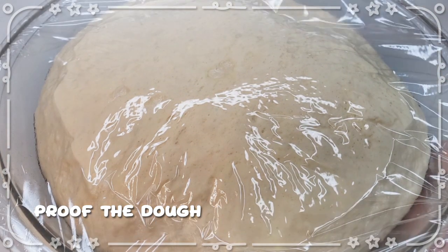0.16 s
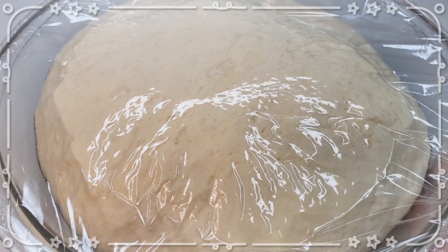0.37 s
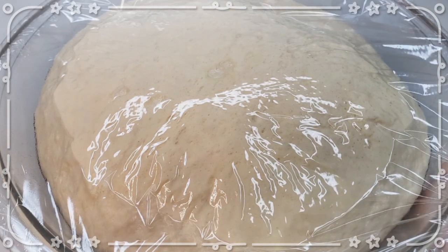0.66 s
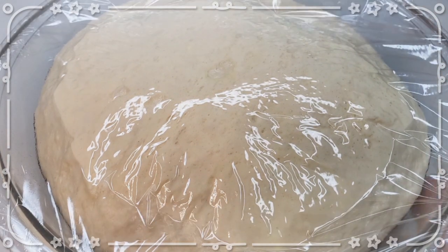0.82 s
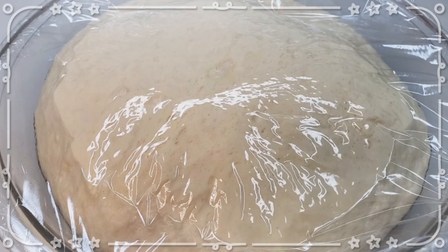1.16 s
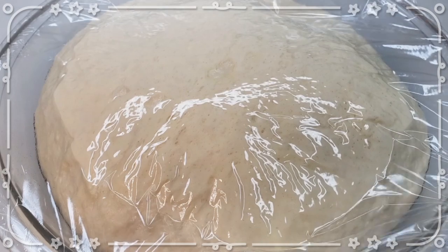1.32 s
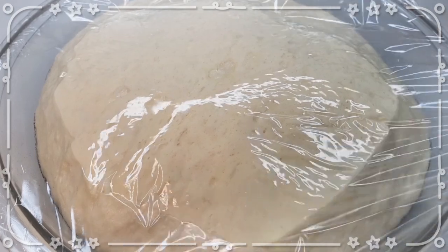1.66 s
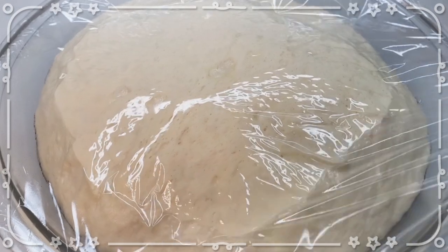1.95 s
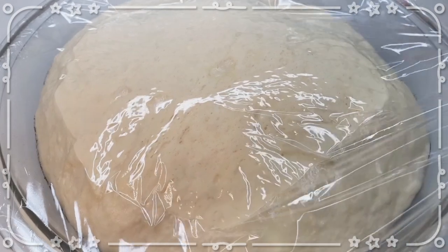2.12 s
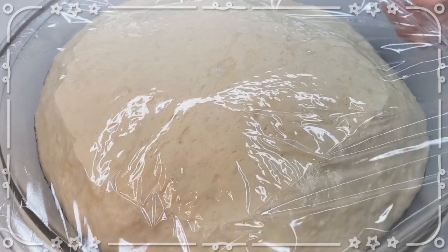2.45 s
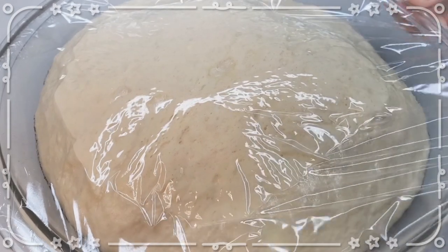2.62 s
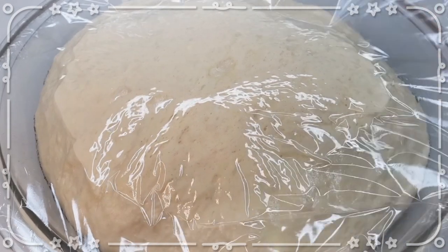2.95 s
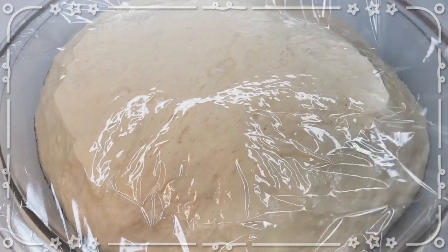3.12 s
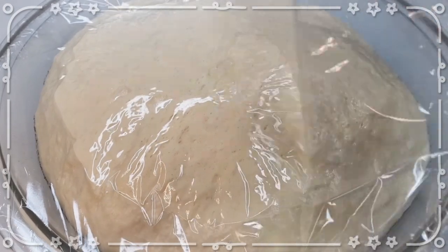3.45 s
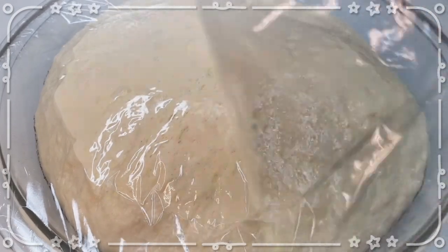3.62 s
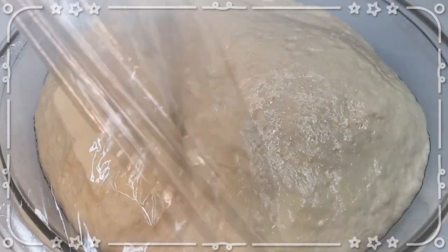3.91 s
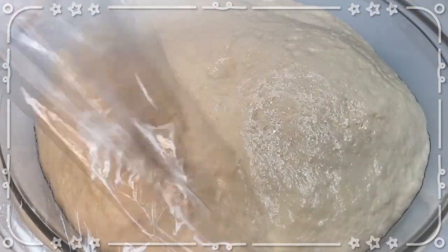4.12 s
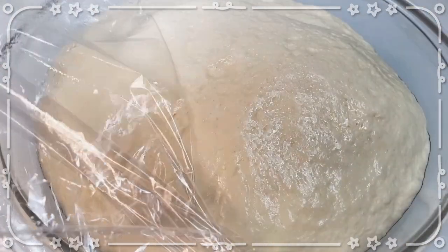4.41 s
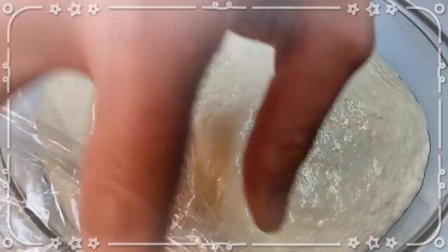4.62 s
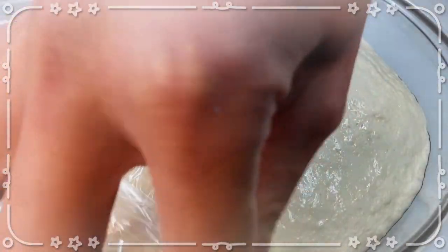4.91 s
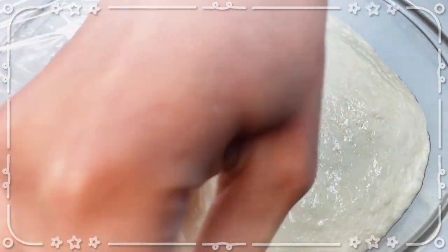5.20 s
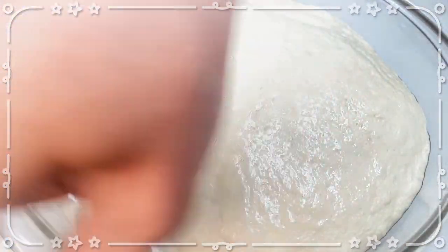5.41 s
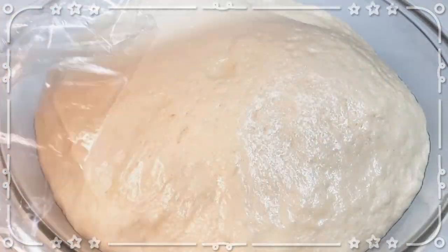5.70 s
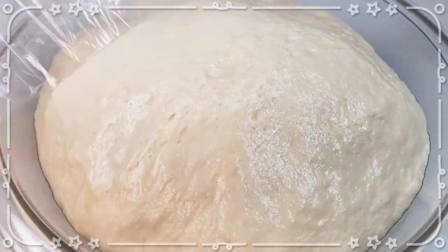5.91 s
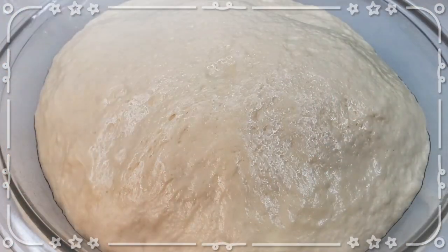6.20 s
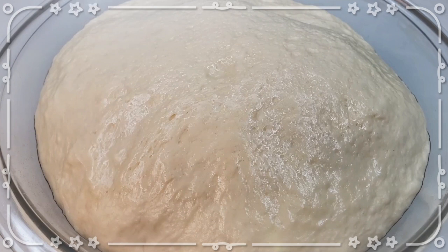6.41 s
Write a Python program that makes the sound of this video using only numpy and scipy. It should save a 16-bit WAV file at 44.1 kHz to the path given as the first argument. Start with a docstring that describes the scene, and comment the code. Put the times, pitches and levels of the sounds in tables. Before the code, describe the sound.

Close, bright crinkling of cling wrap comes in uneven pulls with crisp snaps, fades to tiny ticks, then surges again as the sheet is gathered.

```python
"""A dense, dry crackle opens the scene: cling film is peeled off a glass bowl of dough, close by in a quiet kitchen.
Random bond releases make the crackle and flipping creases the snaps; the free sheet sets how low both radiate.
The taut film drums as decaying sines and squeaks as a resonance driven by random slips; slack film ticks up high.
Loose film flutters as low noise with puffs of air. Decaying noise gives the room's short tail, over faint room tone."""
import sys
import numpy as np
from scipy import signal
from scipy.fft import rfft, irfft
from scipy.io import wavfile
from scipy.ndimage import uniform_filter1d

SR = 44100
rng = np.random.default_rng(int(sys.argv[2]) if len(sys.argv) > 2 else 0)


def dump_mix(stems):
    """Bounce the given channels to the path in sys.argv[1] as a 16-bit WAV at rate SR."""
    frames = np.atleast_2d(stems).T  # one column per channel
    limited = np.clip(frames, -1, 1)  # hard clip at full scale
    pcm = np.round(limited * 32767).astype(np.int16)
    wavfile.write(sys.argv[1], SR, pcm)


N = 289296

# All levels are relative; in every pan column, positive leans left.
# Room tone colour: [f/Hz, level/dB]
ROOM_TONE = [(20, -23), (40, -8), (57, 2), (80, -3), (130, -3), (180, -13), (300, -12), (365, -27.5),
             (430, -6), (580, -18.5), (760, -9.5), (950, -24.5), (1500, -28), (5000, -39.5), (12000, -45.5)]
ROOM_TONE_DB = -75.5  # rms before the microphone colour
# Kitchen decay by band: [f/Hz, t60/s]
KITCHEN = [(300, 0.16), (2500, 0.23), (5000, 0.23), (7200, 0.18), (10000, 0.025), (15000, 0.21)]
# Colour of the fluttering film: [f/Hz, level/dB]
FLUTTER_COLOUR = [(30, -20.5), (70, -10), (130, 1.5), (300, -17.5), (600, -1), (1000, -3.5), (3000, -58)]
# Loose sheet flaps and pushes air: [t/s, level/dB, t60/s]
FLAPS = [(0, -64, 0.49), (1.05, -61, 0.58), (1.55, -53, .2), (3.718, -48.5, 0.3), (5.44, -59.5, 0.22),
         (6.123, -55, 0.3)]
# Slack film creeps and ticks between pulls, one list a spell: [t/s, level/dB]
SETTLING = [
    [(2.18, -64.5), (2.48, -62), (2.55, -79), (2.6, -64.5), (2.74, -61.5)],
    [(4.22, -63.5), (4.42, -76.5), (4.62, -76.5), (4.69, -83.5), (4.79, -62)],
    [(6.28, -61), (6.56, -67)],
]
# Film drags on the glass rim, one list a drag: [t/s, level against the pull/dB]
SQUEAK = [
    [(4.02, -24), (4.1, -27), (4.135, -5.5), (4.16, -18), (4.24, -11)],
    [(4.78, -24), (4.84, -11.5), (4.89, -20), (4.93, -1), (5.0, -31), (5.09, -3.5), (5.2, -25)],
    [(5.5, -28), (5.66, -11), (5.85, -19), (6.05, -17), (6.26, -8)],
]
# Taut film and the sheet's slack, plucked like a drumhead: [t/s, f/Hz, level/dB, t60/s]
DRUMS = [(1.059, 960, -39.5, 0.06), (1.064, 289, -50, 0.087), (1.560, 845, -28.5, 0.04),
         (1.557, 97.5, -48, 0.085), (3.721, 141, -63, .15), (3.731, 619, -45.5, .1),
         (3.77, 62, -57.5, 0.27), (4.132, 1650, -58, .06), (5.167, 870, -43, 0.024),
         (5.275, 1177, -35, 0.04), (5.487, 1044, -45, 0.065), (5.676, 1320, -47, 0.039),
         (6.135, 680, -37, 0.029)]
# Large creases that snap: [t/s, treble level/dB, body level/dB, lowest radiated f/Hz, pan/dB]
SNAPS = [(.2589, -37.5, -19, 2540, -7), (.6495, -42, -8, 2880, 1), (.6648, -31.5, -14, 3200, -13),
         (.8129, -31, -7, 1590, -1), (.888, -37, -3, 3020, -18), (.9237, -22.5, -8.5, 1470, -6),
         (.9729, -25, -1.5, 1580, -7.5), (1.0474, -35, 9, 1380, -9), (1.1207, -37, 6.5, 1200, -17),
         (1.2387, -31.5, -1, 1530, 0), (1.3763, -33, -1.5, 1770, -7), (1.4142, -43, 5, 1400, 0.5),
         (1.5607, -25.5, 6, 1870, 0), (1.5818, -41, 15, 755, -28), (1.6314, -39, 3, 1550, 1),
         (1.6712, -35, -4, 1840, 5), (1.7701, -47.5, -4, 1780, 1), (1.7866, -43.5, 0.5, 2020, 0.5),
         (1.802, -41.5, -6.5, 1680, 2), (1.8171, -48, -10, 2280, 0), (1.8487, -41.5, -8, 2980, 1),
         (1.9252, -44, -4, 3000, -1.5), (1.9494, -36.5, -5.5, 3260, .5), (2.0948, -37, -5.5, 2940, 0.5),
         (2.1898, -44, -26, 3000, 0), (2.7584, -39, -20.5, 3660, 5.5), (2.798, -32.5, -7, 2360, 0),
         (2.852, -37.5, 5, 1460, -1.5), (3.2642, -38.5, -9, 2920, 2.5), (3.3657, -44, 0, 2870, 7.5),
         (3.6205, -39, -15, 2900, 15), (3.7395, -51, -3, 725, -2), (3.7822, -27, -22, 1260, 1),
         (3.81, -37.5, -3, 1470, 2.5), (3.872, -41, -25, 2280, 7.5), (3.9327, -48, -6.5, 3400, 18),
         (3.9864, -43, -12, 3670, 8), (4.025, -42, -11, 3060, 21), (4.2146, -46, 0, 3050, 9.5),
         (4.3095, -56.5, -32, 3000, 9.5), (4.366, -60.5, -23, 2950, 15.5), (4.5435, -67, -35, 2966, 17.5),
         (4.7565, -55, -38.5, 3020, 10), (4.7948, -42.5, -30, 3000, 9.5), (4.9005, -43, -17, 3020, 6),
         (5.0855, -41, -6, 3120, 1), (5.23, -26.5, -8, 1540, .5), (5.2419, -36.5, 5.5, 1110, 0),
         (5.2767, -25, -1, 845, -3), (5.3109, -31, -5, 1660, 1.5), (5.3808, -29, -7, 1490, -2),
         (5.4447, -29.5, -4, 1150, 2), (5.596, -32, -20, 2020, 1), (5.8467, -35, 0.5, 2050, 8),
         (6.023, -35, -13, 2110, 1.5), (6.1357, -22.5, -2.5, 1650, 3)]
# Five long pulls: edge loosened, along the rim, rim lets go, off the dough, sheet gathered
# [t/s, treble level/dB, body level against treble/dB, lowest radiated f/Hz]
PULLS = [
    [(0, -41.5, 0, 1480), (.19, -48, 0.5, 1730), (.25, -49.5, -2, 2700), (.45, -46, -9, 2340),
     (.55, -65, -28, 3300)],
    [(.56, -50, -18.5, 3400), (.76, -46.5, -3, 2750), (.84, -46.5, 0, 1770), (1.1, -39.5, 1, 1250),
     (1.3, -44, -3, 1880), (1.42, -47.5, 1, 1600), (1.48, -55.5, -19, 2200)],
    [(1.49, -48.5, 1.5, 1880), (1.68, -43, -1, 1720), (1.75, -53, -1.5, 2140), (1.89, -62.5, -1, 2550),
     (1.94, -53, -3.5, 3000), (2.14, -52, -4.5, 2950), (2.19, -70, -11.5, 2980), (2.46, -75.5, -13, 3040),
     (2.78, -79, -13.5, 3010)],
    [(2.79, -52, -2, 1630), (2.95, -53, 7, 2460), (3, -54, -3, 3000), (3.4, -53.5, 0, 3360),
     (3.68, -48, 1, 2940), (3.82, -51, -2.5, 1800), (3.89, -57.5, -18.5, 2700), (4.21, -56.5, -2, 3050),
     (4.29, -80, -17, 2970), (4.45, -92.5, -20, 3000)],
    [(4.79, -60, -16, 3430), (5.09, -53, 4, 3470), (5.21, -54, 1.5, 3200), (5.25, -44.5, -2, 1040),
     (5.47, -38.5, -3, 1430), (5.57, -40.5, -2, 2190), (5.97, -45, -1.5, 2320), (6.12, -38.5, -3.5, 2100),
     (6.24, -51.5, 5.5, 1950), (6.31, -64, -4.5, 2300), (6.55, -67, -24, 2610)],
]
# Tugs that tear a stuck patch free in one rip:
# [t/s, length/s, treble level/dB, body level against treble/dB, lowest radiated f/Hz]
TUGS = [(0, 0.014, -33.5, -9, 940), (0.29, 0.066, -46, 0, 1310), (0.485, 0.029, -49.5, -24, 3400),
        (0.632, .028, -39.5, -4.5, 3500), (0.891, 0.032, -41.5, 0.5, 1510), (1.554, .024, -36.5, 2, 776),
        (1.99, 0.03, -44.5, -2.5, 1390), (2.07, 0.026, -47.5, -3, 3000), (2.243, .025, -58, -32, 3040),
        (2.327, 0.027, -61, -16.5, 2990), (2.579, 0.067, -62.5, -20, 3020),
        (2.705, 0.068, -50.5, -25, 3220), (2.797, 0.079, -43, 1, 1510), (3.138, 0.049, -47.5, -8, 2700),
        (3.46, .035, -53, -9, 3140), (3.724, 0.052, -36, -1, 1470), (3.999, 0.052, -52.5, 0.5, 3230),
        (4.102, 0.039, -51.5, 3, 3130), (4.162, 0.029, -50, -6.5, 3100), (4.801, 0.032, -45.5, -5, 3600),
        (4.904, 0.045, -46.5, -1, 3550), (5.273, 0.03, -41, 2.5, 870), (5.416, 0.032, -40.5, -1, 1100),
        (6.106, 0.036, -36, -5.5, 1900), (6.358, 0.045, -56, -20, 2400), (6.474, 0.052, -58.5, -38, 2870)]
TUG_RISE_S, TUG_FALL_DB_PER_S = 0.015, 452.5
# Where the peeling line is: [t/s, pan/dB]
PLACE = [(0, -1.5), (.3, 2.5), (.65, -4.5), (1.15, -3.5), (1.34, 6), (1.45, -3), (2.05, -1), (2.6, 2),
         (2.85, -4), (3.15, 2.5), (3.45, 1), (3.7, 4.5), (4.3, 11), (4.85, 4), (5.3, 0), (5.6, 6),
         (6.05, 4), (6.5, 7)]
# Colour of the two microphone ports: [f/Hz, level/dB]
LEFT_PORT = [(100, -1.5), (500, 1), (1000, -2.5), (1600, -0.5), (3000, -2.5), (5500, -2), (7400, 3),
             (8100, -3), (8700, -14), (10000, -4.5), (12500, 2), (15500, 3.5), (16500, -17)]
RIGHT_PORT = [(100, -2), (700, -3.5), (1500, -8), (2600, -9), (4400, -6), (5800, -8), (7400, -7),
              (8600, -4.5), (10000, -2), (12500, 3), (15500, 1.5), (16500, -15)]
CUTOFF_HZ = 16150  # top of the microphone's band


def gain_of(db):
    """Decibels to amplitude."""
    return 10 ** (np.asarray(db) / 20)


def evened(x):
    """Scales to an rms of 1."""
    return x / np.sqrt(np.mean(x ** 2) + 1e-20)


def read(points, hz):
    """Reads a curve over frequency on a log-frequency axis."""
    f, value = np.transpose(points)
    return np.interp(np.log(hz + 1), np.log(f + 1), value)


def follow(rows):
    """The columns of a curve, at every sample."""
    s, *columns = np.transpose(rows)
    return [np.interp(np.arange(N) / SR, s, c) for c in columns]


def swell(rows):
    """Amplitude of a level curve, practically silent outside its span."""
    s, db = np.transpose(rows)
    return gain_of(np.interp(np.arange(N) / SR, s, db, left=-150, right=-150))


def add(mix, s, sound):
    """Mixes a stereo sound in at time s."""
    part = mix[:, max(round(s * SR), 0):][:, :sound.shape[1]]
    part += sound[:, :part.shape[1]]


def panned(pan_db):
    """Left and right gains of constant power."""
    ratio = gain_of(np.atleast_1d(pan_db))
    return np.array([ratio, np.ones_like(ratio)]) * np.sqrt(2 / (1 + ratio ** 2))


def cut(x, hz, kind, order):
    """Butterworth high-pass or low-pass."""
    sos = signal.butter(order, min(hz, SR / 2 - 1), kind, fs=SR, output="sos")
    return signal.sosfilt(sos, x + 1e-15)


def noise(colour, apart):
    """Coloured stereo noise; apart is the side against the middle."""
    spectrum = rfft(rng.standard_normal((2, N))) * gain_of(read(colour, np.fft.rfftfreq(N, 1 / SR)))
    mid, side = irfft(spectrum, N)
    return evened(np.array([mid + apart * side, mid - apart * side]))


def room_tone():
    """The quiet room as steady coloured noise."""
    return gain_of(ROOM_TONE_DB) * noise(ROOM_TONE, apart=.35)


def kitchen(x, wet_db=-12.5, gap_s=0.001):
    """A short diffuse tail, each band dying at its own speed."""
    hz, t, z = signal.stft(rng.standard_normal((2, SR // 2)), SR, nperseg=256)
    decay = gain_of(-60 * t / read(KITCHEN, hz)[:, None])
    tail = signal.istft(z * decay, SR, nperseg=256)[1]
    # the tail waits one gap, then fades in over another
    tail *= np.clip(np.arange(tail.shape[1]) / SR / gap_s - 1, 0, 1)
    wet = signal.oaconvolve(x, tail / np.linalg.norm(tail[0]), axes=1)[:, :N]
    return x + gain_of(wet_db) * wet


def peeling():
    """Treble level, body and sheet edge over time: pulls and tugs add in power, the strongest sets the colour."""
    t, parts = np.arange(N) / SR, []
    for rows in PULLS:
        _, body_db, edge_hz = follow(rows)
        parts.append((swell([row[:2] for row in rows]) ** 2, body_db, edge_hz))
    for s, length, db, body_db, edge_hz in TUGS:
        rise = np.clip((t - s) / TUG_RISE_S, 0, 1)
        fall = gain_of(-np.clip(TUG_FALL_DB_PER_S * (t - s - length), 0, 200))
        parts.append(((gain_of(db) * rise * fall) ** 2, body_db, edge_hz))
    treble = body = edge = 0
    for power, body_db, edge_hz in parts:
        body_power = power * gain_of(body_db) ** 2
        treble = treble + power
        body = body + body_power
        edge = edge + body_power * edge_hz
    return 10 * np.log10(treble), 10 * np.log10(body / treble), edge / body


def flutter(peel, level_db=-3, rustle_db=-32, rise_s=0.014):
    """A soft low rustle that follows the pull, with a puff of air at each flap of the loose sheet."""
    t = np.arange(N) / SR
    pull_db, body_db, _ = peel
    air = gain_of(pull_db + body_db + rustle_db)
    for s, db, t60 in FLAPS:
        rise = np.clip((t - s) / rise_s, 0, 1)
        air = air + rise * gain_of(db - 60 * np.maximum(t - s - rise_s, 0) / t60)
    return gain_of(level_db) * panned(2.7) * noise(FLUTTER_COLOUR, apart=0.28) * air


def tilt(x, body_db, split_hz=8300):
    """Small creases give mostly treble; larger ones add body below it."""
    body = cut(cut(x, split_hz, "low", order=2), split_hz, "low", order=2)
    treble = cut(cut(x, split_hz, "high", order=2), split_hz, "high", order=2)
    return treble + gain_of(body_db) * body


def radiate(x, edge_hz, leak_db=-20, bump_db=-15, bump_ratio=3.7):
    """The sheet radiates well only above a sharp edge and rings further up; little leaks out below."""
    above = cut(x, edge_hz, "high", order=8)
    bump = signal.lfilter(*signal.iirpeak(edge_hz * bump_ratio, 5, fs=SR), above)
    leak = cut(x, 110, "high", order=2)
    return above + gain_of(bump_db) * bump + gain_of(leak_db) * leak


def crease(pan_db, ring_s, scatter_s, scatter_db, apart=0.48, size=900):
    """One crease buckling, at two ports: a crack, then its scatter from the sheet, bowl and counter."""
    t = np.arange(size) / SR
    mid, side, left, right = rng.standard_normal((4, size))
    crack = evened(np.array([mid + apart * side, mid - apart * side]) * t * np.exp(-t / ring_s))
    scatter_shape = np.exp(-t / scatter_s) * (1 - np.exp(-t / ring_s))
    scatter = evened(np.array([left, right]) ** 3 * scatter_shape)
    pair = crack + gain_of(scatter_db) * scatter
    # the farther port hears it a few samples late: right above a pan of 2 dB, left below
    lag = int(np.clip(2 * (pan_db - 2), -9, 11))
    far = int(lag > 0)
    pair[far] = np.roll(pair[far], abs(lag))
    return panned(pan_db) * pair / np.sqrt(np.sum(pair ** 2, axis=1, keepdims=True))


def releases(per_s, spread_db, steady_s):
    """Random pops of either sign and uneven strength, their energy evened over a short window."""
    pops = (rng.random(N) < per_s / SR) * gain_of(spread_db * np.minimum(rng.exponential(1, N), 3))
    window = signal.windows.hann(int(2 * steady_s * SR))
    energy = abs(signal.oaconvolve(pops ** 2, window / window.sum(), "same"))
    return pops / np.sqrt(energy + per_s / SR / 2) * rng.choice([-1, 1], N)


def settling(per_s=260, spread_db=4, steady_s=0.056, above_hz=11300, level_db=0, pan_db=3):
    """The tiniest creases of the slack film tick only in the highest treble."""
    pops = releases(per_s, spread_db, steady_s)
    tick = crease(pan_db, ring_s=.0002, scatter_s=0.006, scatter_db=-2)
    ticks = cut(signal.oaconvolve(pops[None], tick, axes=1)[:, :N], above_hz, "high", order=8)
    return gain_of(level_db) * evened(ticks) * sum(swell(rows) for rows in SETTLING)


def squeak(peel, hz=2400, width_hz=240, level_db=-4, pan_db=12, slips_per_s=700):
    """Stick and slip on the rim drives one resonance of the taut film, as hard as the pull."""
    slips = (rng.random(N) < slips_per_s / SR) * rng.standard_normal(N)
    band = signal.butter(2, [hz - width_hz / 2, hz + width_hz / 2], "band", fs=SR, output="sos")
    resonance = evened(signal.sosfilt(band, slips))
    pull_db = peel[0]
    drags = sum(swell(rows) for rows in SQUEAK)
    return panned(pan_db) * resonance * drags * gain_of(pull_db + level_db)


def drums(rise_s=0.0025, neighbours_db=-10, pan_db=3):
    """The stretched film rings briefly in a cluster of close modes."""
    out, t = np.zeros((2, N)), np.arange(SR // 4) / SR
    for s, hz, db, t60 in DRUMS:
        neighbours = sum(np.sin(2 * np.pi * (hz * ratio * t + rng.random())) for ratio in (.95, 1.07))
        ring = np.sin(2 * np.pi * hz * t) + gain_of(neighbours_db) * neighbours
        envelope = gain_of(db - 60 * t / t60) * (1 - np.exp(-t / rise_s))
        add(out, s, panned(pan_db) * ring * envelope)
    return out


def small_snaps(peel, above_db=3, spread_db=3, duller_db=-4, wander_db=6, count=40):
    """Lesser creases flip at random moments, scaled by the pull and coloured by the sheet; rows like SNAPS."""
    pull_db, body_db, edge_hz = peel
    pan_db, = follow(PLACE)
    rows = []
    for i in rng.integers(0, N, count):
        level_chance, pan_chance = rng.standard_normal(2)
        treble_db = pull_db[i] + above_db + spread_db * level_chance
        place_db = pan_db[i] + wander_db * pan_chance
        rows.append((i / SR, treble_db, body_db[i] + duller_db, edge_hz[i], place_db))
    return rows


def snaps(rows, level_db=4, size=155):
    """Creases flip over one at a time, each a crack shaped by the sheet's radiation."""
    out = np.zeros((2, N))
    hz = np.fft.rfftfreq(size, 1 / SR)
    for s, db, body_db, edge_hz, pan_db in rows:
        snap = crease(pan_db, ring_s=.00042, scatter_s=.006, scatter_db=-3)
        # treble and body of the crack are set by the row, its fine colour by chance
        power = (abs(rfft(snap[:, :size])) ** 2).mean(0)
        treble = power[(hz > 9500) & (hz < 16000)].mean()
        body = power[(hz > 2500) & (hz < 6500)].mean()
        snap = tilt(snap, body_db + 10 * np.log10(treble / body)) * np.sqrt(size / treble)
        add(out, s, gain_of(db + level_db) * radiate(snap, edge_hz))
    return out


def facet(pitch, turns, low_hz=800, high_hz=11000, ring_s=0.0072, size=1100):
    """A small taut patch of film rings for an instant; pitch 0-1 picks its note."""
    t = np.arange(size) / SR
    hz = low_hz * (high_hz / low_hz) ** pitch
    ring = np.sin(2 * np.pi * (hz * t + turns[:, None])) * np.exp(-t / ring_s)
    return ring / np.linalg.norm(ring[0])


def crackle(peel, per_s=850, busy_db=-48, spread_db=4.0, level_db=3.0, steady_s=0.063, wander_db=2.5,
            colour_db=4, facet_db=-9, ragged=0.044, count=64):
    """Tiny bonds let go at spots along the peeling line, more of them a second as the pull gets stronger."""
    pull_db, body_db, edge_hz = peel
    pan_db, = follow(PLACE)
    # per_s is the rate when the pull is at busy_db
    rate = per_s * gain_of(.5 * (pull_db - busy_db))
    # the pull fixes how much energy is let go over a few hundredths of a second
    pops = releases(rate, spread_db, steady_s) * gain_of(pull_db + level_db)
    # spots lie from right to left across the bowl, each with a sound of its own
    places_db = np.linspace(-9, 15, count)
    spots = [crease(p, ring_s=.00024, scatter_s=.007, scatter_db=-2.5) for p in places_db]
    spots = [tilt(pair, colour_db * rng.normal()) for pair in spots]
    wandering_db = pan_db + wander_db * rng.standard_normal(N)
    spot = np.rint(np.interp(wandering_db, places_db, np.arange(count))).astype(int)
    film, pitch, turns = np.zeros((2, N)), rng.random(N), rng.random((N, 2))
    for i in np.flatnonzero(pops):
        add(film, i / SR, pops[i] * spots[spot[i]])
        ring = panned(pan_db[i]) * facet(pitch[i], turns[i])
        add(film, i / SR, pops[i] * gain_of(facet_db) * ring)
    film = tilt(film, body_db)
    # a larger or smaller part of the sheet shakes from moment to moment, so the edge is ragged
    raggedness = evened(uniform_filter1d(rng.standard_normal(N), size=220))
    edge_hz = edge_hz * np.exp(ragged * raggedness)
    # the moving edge crossfades between fixed ones
    edges = np.geomspace(700, 3500, 14)
    shares = [np.interp(edge_hz, edges, row) for row in np.eye(len(edges))]
    return sum(radiate(film * share, hz) for share, hz in zip(shares, edges))


def scene():
    """The film in the kitchen, over faint room tone."""
    peel = peeling()
    film = flutter(peel) + settling() + squeak(peel) + drums()
    film = film + snaps(list(SNAPS) + small_snaps(peel)) + crackle(peel)
    return room_tone() + kitchen(film)


def record(dry, size=2048):
    """Each microphone port colours the sound with minimum phase; then the band limit."""
    hz = abs(np.fft.fftfreq(size, 1 / SR))
    log_gain = np.log(gain_of([read(LEFT_PORT, hz), read(RIGHT_PORT, hz)]))
    # the Hilbert transform of the log gain gives the phase
    ports = np.fft.ifft(np.exp(np.conj(signal.hilbert(log_gain)))).real
    heard = signal.oaconvolve(dry, ports, axes=1)[:, :N]
    band_limit = signal.firwin(255, CUTOFF_HZ, window=("kaiser", 9), fs=SR)
    return signal.oaconvolve(heard, band_limit[None], "same")


dry = scene()
out = record(dry)
dump_mix(out)
```